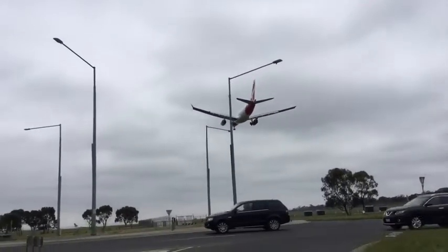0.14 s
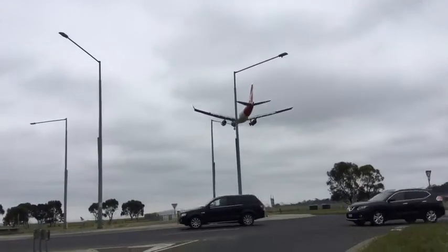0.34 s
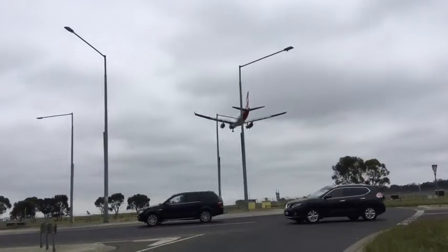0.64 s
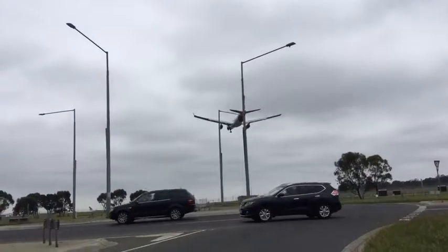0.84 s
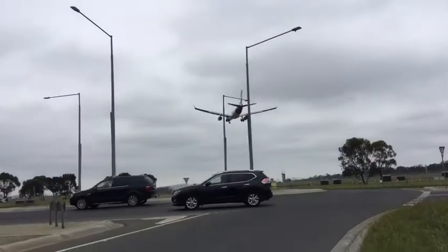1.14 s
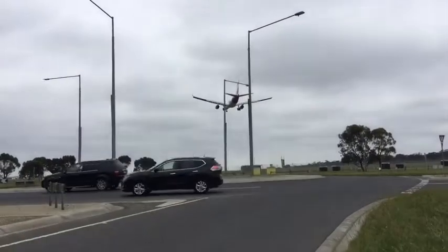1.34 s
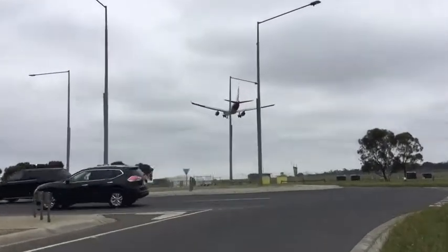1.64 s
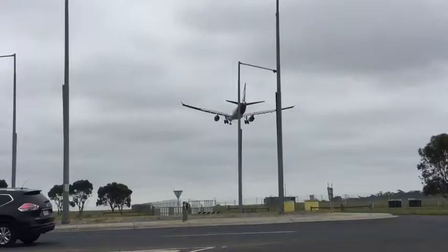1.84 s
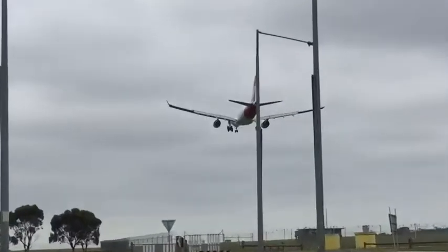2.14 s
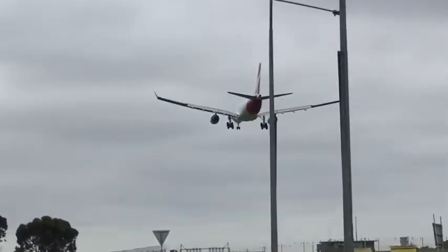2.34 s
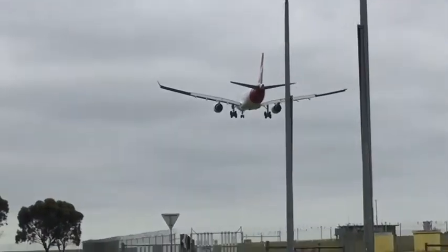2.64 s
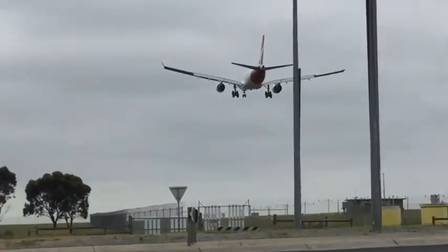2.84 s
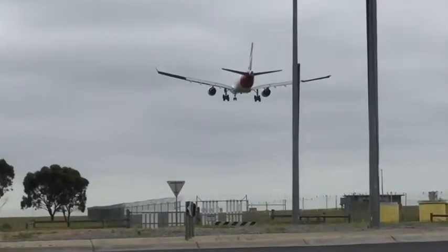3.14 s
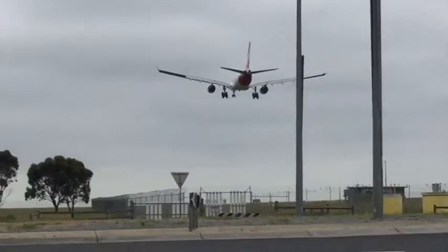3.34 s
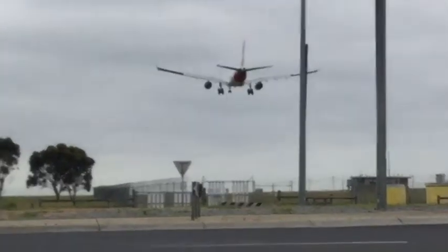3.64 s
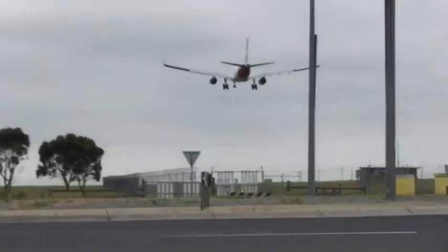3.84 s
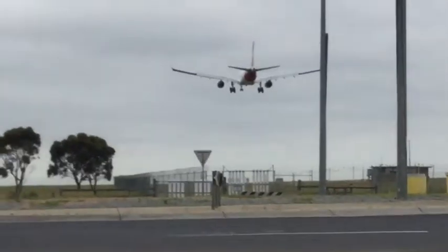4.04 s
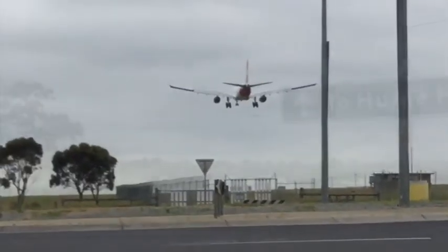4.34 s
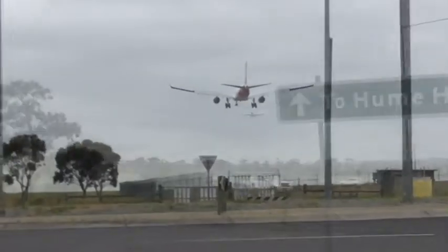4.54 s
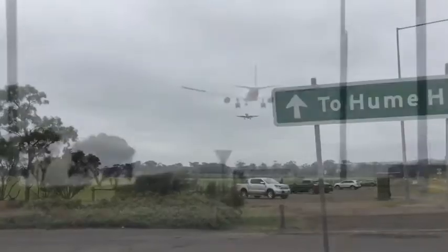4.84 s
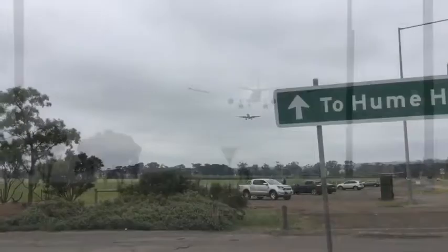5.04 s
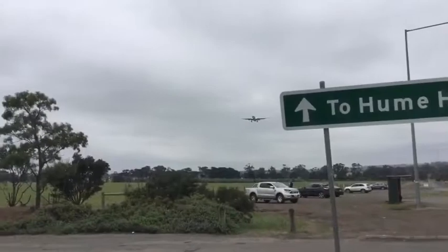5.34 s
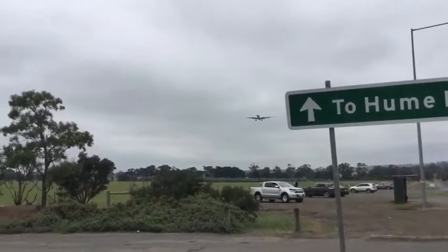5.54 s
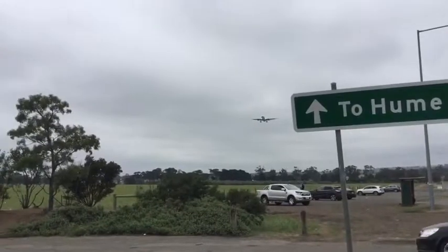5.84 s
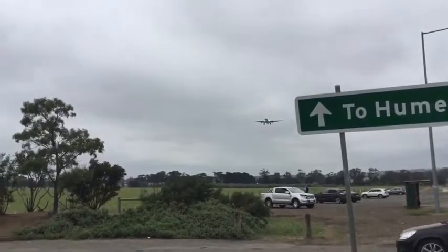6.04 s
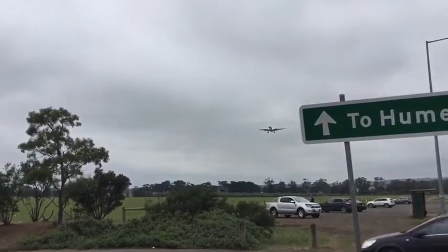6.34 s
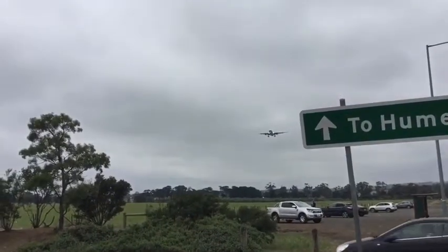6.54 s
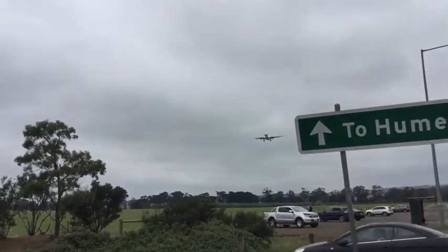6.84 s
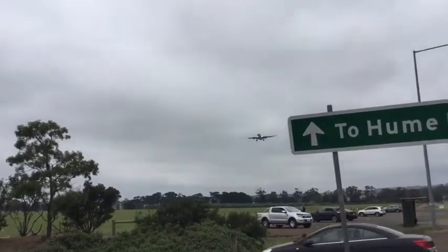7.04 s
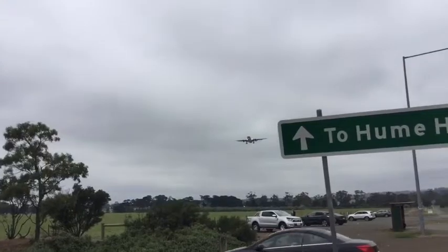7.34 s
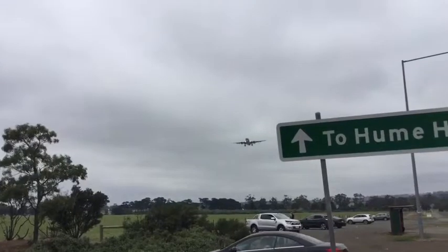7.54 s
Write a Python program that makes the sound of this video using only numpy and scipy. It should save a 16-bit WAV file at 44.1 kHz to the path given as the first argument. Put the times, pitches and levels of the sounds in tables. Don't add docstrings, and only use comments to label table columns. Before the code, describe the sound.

A handheld phone stands at an open roadside near an airport. From 0 s an airliner just past overhead gives a loud, deep, turbulent roar with hiss on top, rumbling in irregular bursts. A hollow tone near 330 Hz is strongest at 0.2 s, then weakens and ends around 3.5 s. Breathy whistles near 4 kHz come at 0.4 and 1 s, with fainter ones later and a slow rise from 3.35 s. The treble dies away and a comb-like colouring climbs; cars hum faintly around 1.3 and 2.65 s. Between 4.4 and 5.1 s it crossfades to closer traffic: overlapping tyre and engine swells, faint spray hiss, and a low engine note sagging from 4.9 to 5.75 s. Thin squeals appear around 4.7-5.7 s, a lower one at 6.95 s. From 6.25 s a distant jet whines very faintly; ticks click at 6.3 and 7.3 s as traffic continues to the end.

```python
import sys
import numpy as np
from scipy import signal
from scipy.fft import rfft, irfft, next_fast_len
from scipy.io import wavfile
from scipy.ndimage import uniform_filter1d, map_coordinates

SR = 44100
rng = np.random.default_rng(int(sys.argv[2]) if len(sys.argv) > 2 else 0)


def boost_factor(decibels):
    exponent = np.asarray(decibels, float) / 20
    return 10 ** exponent


def pcm_store(signal):
    levels = np.round(np.clip(np.atleast_2d(signal), -1, 1) * 32767)
    wavfile.write(sys.argv[1], SR, levels.astype(np.int16).T)


N = 339570

# pitch_hz, density_db
MIC_HISS = [(4000, -28), (5500, 2.5), (6600, 4.5), (7600, -2), (9000, -2), (10000, -9), (11500, -9.5),
            (13000, -12.5)]
# start_s, end_s
DISSOLVE = (4.38, 5.14)

# pitch_hz, density_db
TREAD = [(300, -39), (520, 0), (700, 2), (850, -15.5), (1300, -21), (2500, -59), (5000, -120)]
# nearest_s, peak_db, half_width_s
TURNING_CARS = [
    (1.3, -31, .9),
    (2.65, -32, .15),
]

# pitch_hz, density_db
TRAFFIC = [(22, -30.5), (38, -13.5), (55, -1), (130, -3.5), (290, -5.5), (490, -13), (720, -8.5),
           (1020, -6), (1400, -13.5), (1750, -14.5), (2300, -21.5), (3500, -33.5), (5500, -53),
           (9000, -69.5)]
# steady_db, share_of_pass, wander_db
TRAFFIC_PARTS = [
    (-28.5, 0.26, -0.4),
    (-30, 0.71, -1),
    (-33.5, 1.33, -0.06),
    (-41, 0.85, -1),
]
# nearest_s, swell_db, half_width_s, extra_swish_db, extra_engine_db
PASSES = [(4.6, 0.5, 0.11, 2.5, 3.5), (5.2, 0.4, 0.089, .1, -1.5), (5.4, 3, 0.13, -2.2, -1.3),
          (5.65, 0, 0.11, -0.3, 3.4), (5.88, 3, 0.2, -4, -1.7), (6.17, 3, 0.17, 1.6, -0.8),
          (6.4, 1.9, 0.12, 0, -0.2), (6.63, 1.2, 0.16, 5, 1), (6.8, -0.3, 0.12, 1, 1),
          (7.0, 4, 0.33, -.6, 0.3), (7.35, 0.6, .1, -1, -1.7), (7.6, 2.5, 0.32, 1.2, 0.5)]
# pitch_hz, density_db
SPRAY = [(2500, -25.5), (4000, 6), (5500, 1.5), (7000, -8), (9000, -16), (12000, -27), (14000, -33.5)]
# nearest_s, peak_db, half_width_s
NEAR_CARS = [
    (5.02, -59, 0.36),
    (5.36, -58.5, .15),
    (5.65, -60.5, .25),
    (7.7, -59.5, 0.44),
]
# start_s, end_s, pitch_hz, level_db
CAR_NOTE = (4.93, 5.75, 62.5, -25.5)

# start_s, length_s, first_hz, last_hz, level_db
SQUEALS = [
    (4.68, .2, 5600, 5600, -73),
    (4.93, .2, 5620, 5480, -70),
    (5.27, .28, 4980, 4970, -67),
    (5.48, .19, 4980, 4890, -62),
    (5.22, .25, 4480, 4640, -67),
    (6.87, .1, 4990, 4990, -65),
    (6.95, .22, 2600, 2590, -56),
    (6.3, .5, 5600, 5500, -77),
]
# start_s, length_s, first_hz, last_hz, level_db
WHISTLES = [
    (.4, .55, 4080, 4150, -49),
    (1.05, .3, 4250, 4150, -51),
    (2.2, .4, 4960, 5000, -64),
    (2.65, .25, 4220, 4220, -55),
    (3.35, 1.3, 3000, 3380, -56),
    (3.8, .4, 4330, 4110, -57),
    (5.9, .45, 3700, 3900, -65),
]
# time_s, pitch_hz, level_db
FAN_WHINE = [
    (6.25, 4720, -80),
    (6.38, 4710, -69),
    (6.6, 4680, -69),
    (6.95, 4670, -71),
    (7.2, 4720, -71),
    (7.5, 4740, -75),
    (7.7, 4760, -76),
]
# time_s, peak_db, ring_hz, length_ms
TICKS = [
    (5.77, -62, 8000, .15),
    (6.3002, -35, 3800, .14),
    (6.2998, -55, 6900, .3),
    (7.2945, -48, 6700, .7),
    (7.294, -58, 9400, .4),
    (7.294, -58, 11700, .4),
    (7.398, -64, 11000, .15),
    (7.43, -59, 10000, .12),
]

# pitch_hz, density_db
EXHAUST = [(22, -33.5), (35, -24), (55, -1.5), (110, 1), (300, -4), (460, -13.5), (650, -12.5),
           (950, -17.5), (1550, -20), (1850, -25), (3000, -29), (4600, -36), (7000, -52), (10000, -69.5)]
# centre_hz, width_hz, height_db over the exhaust
HAYSTACKS = [
    (4070, 240, 2.5),
    (2080, 150, 3),
    (6100, 440, 3),
]
# start_db, share_of_spreading_loss, share_of_refraction, wander_db
JET_PARTS = [
    (-18.5, 0.99, 0.23, -2),
    (-17.5, 1.03, .3, 1.9),
    (-22.5, 1.12, 0.68, -1),
    (-31.5, 1.39, 0.86, 0.7),
]
# time_s, gain_db
REFRACTION = [(0, -0.5), (.3, -2.1), (.42, 0.5), (.52, 1.5), (.66, 1), (.84, 1.5), (1.0, 2.6), (1.2, 1.7),
              (1.4, 1), (1.7, -0.4), (2.3, -0.9), (2.8, -0.2), (3.3, -0.8), (3.6, 0.2), (4.2, 0.1),
              (4.5, -0.8), (4.8, -7), (5.1, -5)]
# time_s, rumble_db, roar_db
EDDIES = [(.08, 6, 3.8), (.22, -1.5, 5.5), (.36, 3, 3.7), (.57, 4, -0.5), (.72, -4, 1), (1.05, -4, 1.5),
          (1.2, -2.5, 1.3), (1.48, -1.5, 1.5), (2.15, 1, 0.2), (2.25, -2, -1.5), (2.6, -0.5, 3),
          (2.75, -2, .1), (3.78, 3, 3.2), (3.95, -1.1, 3.5), (4.72, 1, -1.5), (.87, -1, 4.5),
          (1.33, 1.5, -0.5), (1.63, 4, -4), (1.77, 6.5, -3), (1.97, 1.5, 2.5), (2.4, 4, 0.5),
          (2.94, 3.5, 1.1), (3.1, 7, -0.5), (3.3, 3.5, 0), (3.48, 2.1, .1), (3.6, -0.5, 2.5),
          (4.18, -0.5, 2), (4.35, 0.5, 4), (4.62, 0.5, 4.5)]
# time_s, swell_db, half_width_s
RUSH_SWELLS = [
    (.45, -0.5, .1),
    (.78, 1.5, .12),
    (1.1, -1.1, 0.16),
    (2.05, 1.9, .15),
    (2.6, -0.5, 0.13),
    (4.17, 0.5, .15),
]
# time_s, level_db
CAVITY = [
    (.05, -35),
    (.2, -21),
    (.33, -27),
    (.75, -27.5),
    (1.05, -31),
    (1.6, -36),
    (2.25, -38),
    (2.45, -32),
    (3.3, -33),
]


def unit(x):
    return x / np.sqrt(np.mean(x ** 2) + 1e-20)


def along(points, hz):
    f, v = np.transpose(points)
    return np.interp(np.log(hz + 1), np.log(f + 1), v)


def curves(rows, t=None):
    s, *columns = np.transpose(rows)
    moments = np.arange(N) / SR if t is None else t
    return [np.interp(moments, s, column) for column in columns]


def wobble(rate, count=N):
    knots = rng.standard_normal(int(count / SR * 400) + 4)
    return map_coordinates(knots, [np.arange(count) * rate / SR])


def filter_over_time(x, gain):
    hz, t, z = signal.stft(x, SR, nperseg=1024)
    return signal.istft(z * gain(hz[:, None], t), SR, nperseg=1024)[1][:N]


def turbulent(patchy_db):
    field = rng.standard_normal((513, N // 512 + 2))
    field = uniform_filter1d(field, size=8, axis=0)
    field = unit(uniform_filter1d(field, size=7, axis=1))
    return filter_over_time(rng.standard_normal(N), lambda hz, t: boost_factor(patchy_db * field[:, :len(t)]))


def layered(colour_db, joins_hz, levels_db, patchy_db):
    m = next_fast_len(N + 8192)
    hz = np.fft.rfftfreq(m, 1 / SR)
    coloured = rfft(turbulent(patchy_db), m) * boost_factor(colour_db(hz))
    centres = np.log(joins_hz)
    shares = [np.interp(np.log(hz + 1), centres, row) for row in np.eye(len(centres))]
    return sum(boost_factor(db) * unit(irfft(coloured * share, m)[:N]) for db, share in zip(levels_db, shares))


def tone(hz, blur_hz, flutter_db):
    phase = 2 * np.pi * np.cumsum(hz + blur_hz * wobble(60)) / SR
    return np.sqrt(2) * np.sin(phase) * boost_factor(flutter_db * wobble(25))


def whistle(hz, width_hz):
    sway = wobble(width_hz, len(hz)) + 1j * wobble(width_hz, len(hz))
    return unit(np.real(sway * np.exp(2j * np.pi * np.cumsum(hz) / SR)))


def gate(start, end, edge):
    t = np.arange(N) / SR
    return np.clip(np.minimum(t - start, end - t) / edge, 0, 1)


def bumps(times, heights, width_s):
    t = np.arange(0, N + 64, 64) / SR
    swells = sum(h * np.exp(-((t - s) / w) ** 2) for s, h, w in np.broadcast(times, heights, width_s))
    return np.interp(np.arange(N) / SR, t, swells)


def passing(cars):
    t = np.arange(N) / SR
    return np.sqrt(sum(boost_factor(db) ** 2 / (1 + ((t - s) / w) ** 2) ** 2 for s, db, w in cars))


def treble_rolloff_db(hz):
    return 35 * np.log2(np.maximum(hz / 9500, 1))


def microphone_hiss():
    hiss = unit(filter_over_time(rng.standard_normal(N), lambda hz, t: boost_factor(along(MIC_HISS, hz))))
    return boost_factor(-70) * hiss * boost_factor(-2.5 * gate(4.3, 4.8, .3))


def junction():
    hum = filter_over_time(turbulent(patchy_db=1.3), lambda hz, t: boost_factor(along(TREAD, hz)))
    return passing(TURNING_CARS) * unit(hum)


def traffic():
    joins_hz = [90, 280, 950, 2400]
    s, swell_db, width_s, swish_db, engine_db = np.transpose(PASSES)
    levels = []
    for hz, (db, share, wander_db) in zip(joins_hz, TRAFFIC_PARTS):
        pass_db = share * swell_db + swish_db * (hz > 2000) + engine_db * (hz < 500)
        levels.append(db + bumps(s, pass_db, width_s) + wander_db * wobble(2.8))
    return layered(lambda hz: along(TRAFFIC, hz) - treble_rolloff_db(hz), joins_hz, levels, patchy_db=0.7)


def tyre_spray():
    colour = lambda hz, t: boost_factor(along(SPRAY, hz) - 40 * (hz < 2500))
    return passing(NEAR_CARS) * unit(filter_over_time(turbulent(patchy_db=2.0), colour))


def labouring_engine():
    start, end, hz, db = CAR_NOTE
    sag_hz_per_s, fade_db_per_s = 8, 4
    since = np.clip(np.arange(N) / SR - start, 0, end - start)
    note = tone(hz - sag_hz_per_s * since, blur_hz=1.2, flutter_db=1.2)
    return boost_factor(db - fade_db_per_s * since) * note * gate(start, end, .15)


def approaching_jet():
    hz, db = curves(FAN_WHINE)
    return boost_factor(db) * whistle(hz, 22) * gate(6.2, 9, .1)


def squeals():
    sound = np.zeros(N)
    for rows, width in ((WHISTLES, .03), (SQUEALS, .024)):
        for s, length, first_hz, last_hz, db in rows:
            glide = np.linspace(first_hz, last_hz, round(length * SR))
            swell = signal.windows.tukey(len(glide), 2 / 3)
            sound[round(s * SR):][:len(glide)] += boost_factor(db) * whistle(glide, width * first_hz) * swell
    return sound


def case_ticks():
    out = np.zeros(N)
    t = np.arange(-SR // 100, SR // 100) / SR
    for s, db, ring_hz, length_ms in TICKS:
        bell = np.exp(-(t * 1e3 / length_ms) ** 2 / 2)
        out[round((s + t[0]) * SR):][:len(t)] += boost_factor(db) * bell * np.sin(2 * np.pi * ring_hz * t)
    return out


RECEDE_M_PER_S = 65


def jet_levels():
    t = np.arange(N) / SR
    start_m, eddy_s = 275, .05
    spreading_db = 20 * np.log10(1 + RECEDE_M_PER_S * t / start_m)
    bent_db, = curves(REFRACTION)
    rumble, roar, rush, hiss = [db - far * spreading_db + bent * bent_db + wander_db * wobble(5)
                                for db, far, bent, wander_db in JET_PARTS]
    s, rumble_db, roar_db = np.transpose(EDDIES)
    early_db = 2 * np.exp(-(t / 0.61) ** 2)
    return [rumble + bumps(s, rumble_db, eddy_s), roar + bumps(s, roar_db, eddy_s) + early_db,
            rush + bumps(*np.transpose(RUSH_SWELLS)), hiss]


def jet_path(hz, t):
    lag_ms = 2.57 / (1 + t / 1.68)
    bounce = np.clip(0.32 - 0.023 * t, 0, 1) * np.exp(-(hz / 1900) ** 2)
    comb = (1 + bounce * np.exp(-2j * np.pi * hz * lag_ms / 1e3)) / np.sqrt(1 + bounce ** 2)
    air_db = 11.5 * RECEDE_M_PER_S * t / 100 - 1.8 * curves(REFRACTION, t)[0]
    return comb * boost_factor(-air_db * (hz / 8860.0) ** 2)


def cavity_whistle():
    hz = 337 - 22 * (1 - np.exp(-np.arange(N) / SR / 4.5))
    return boost_factor(curves(CAVITY)[0]) * tone(hz, blur_hz=1, flutter_db=.8) * gate(-1, 3.55, .2)


def jet():
    def colour(hz):
        humps = sum(db * np.exp(-((hz - c) / w) ** 2) for c, w, db in HAYSTACKS)
        return along(EXHAUST, hz) + humps - treble_rolloff_db(hz)
    noise = layered(colour, [90, 280, 1000, 4000], jet_levels(), patchy_db=0.57)
    return filter_over_time(noise, jet_path) + cavity_whistle()


def scene():
    start, end = DISSOLVE
    turn = np.pi / 2 * np.clip((np.arange(N) / SR - start) / (end - start), 0, 1)
    first = junction() + jet()
    second = traffic() + tyre_spray() + labouring_engine()
    over_both = approaching_jet() + squeals() + case_ticks()
    return (first * np.cos(turn) + second * np.sin(turn) + over_both)[None]


def top_band(hz, t):
    kept = np.repeat(rng.random(len(t)) < .11 * t, 3)[:len(t)]
    return np.where(hz > 13100, kept * .9, 1.)


def low_pass(x):
    return signal.sosfilt(signal.butter(12, 13760, fs=SR, output="sos"), x)


def record(dry):
    rumble_filter = signal.butter(2, 24, "high", fs=SR, output="sos")
    x = signal.sosfilt(rumble_filter, dry[0] + microphone_hiss())
    saturated = x / (1 + (x / 1.5) ** 4) ** (1 / 4)
    mix = filter_over_time(saturated, top_band)
    return low_pass(mix[None])


dry = scene()
out = record(dry)
pcm_store(out)
```